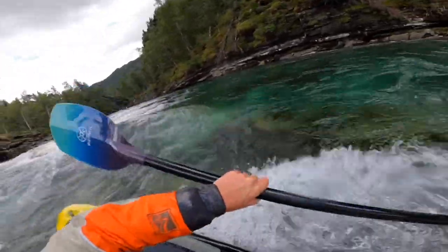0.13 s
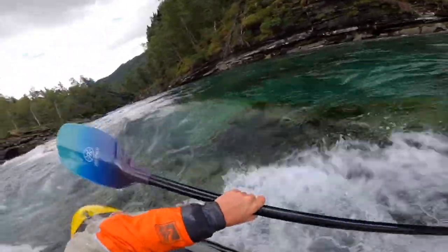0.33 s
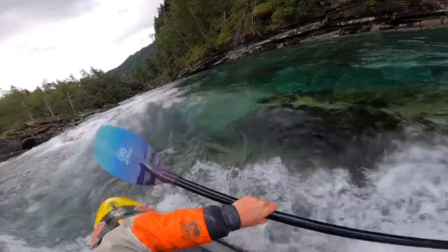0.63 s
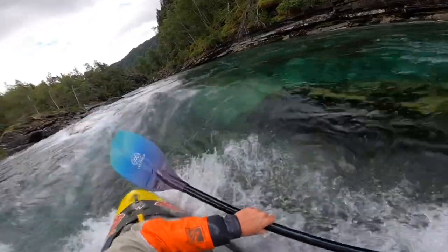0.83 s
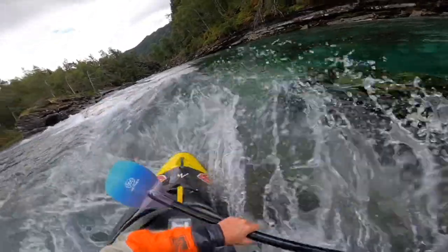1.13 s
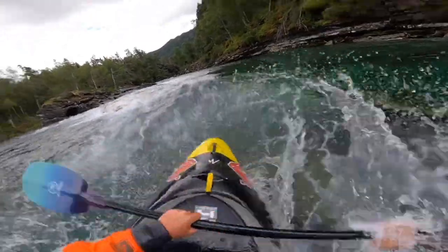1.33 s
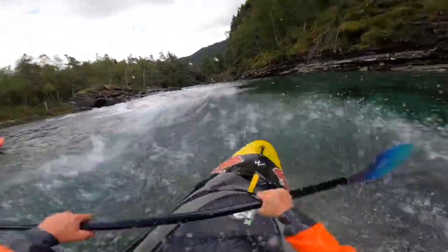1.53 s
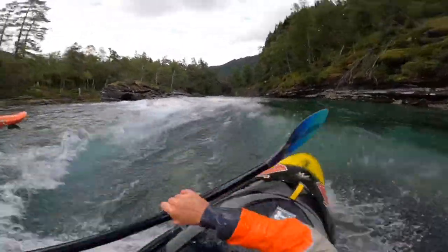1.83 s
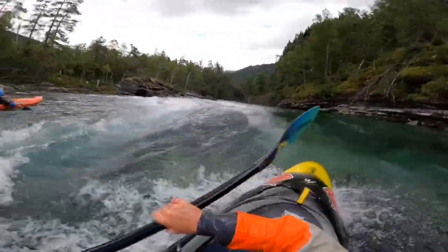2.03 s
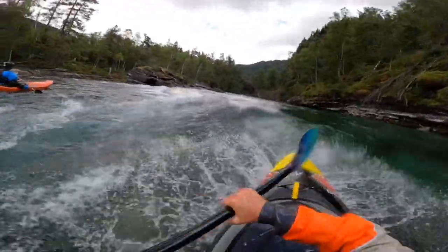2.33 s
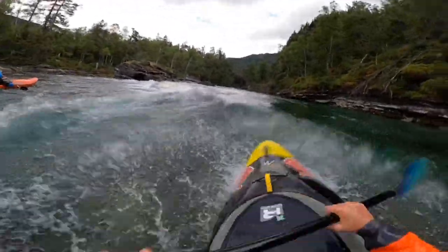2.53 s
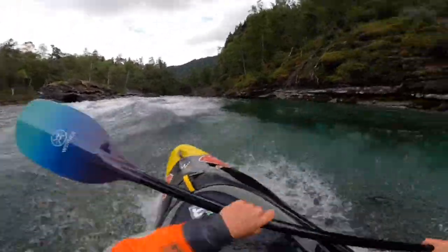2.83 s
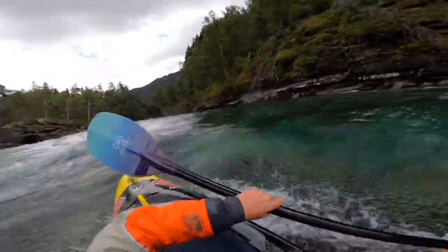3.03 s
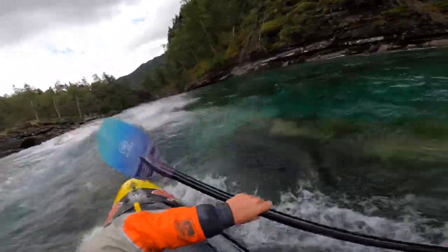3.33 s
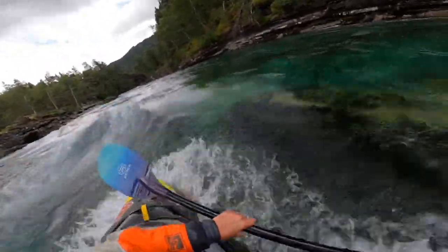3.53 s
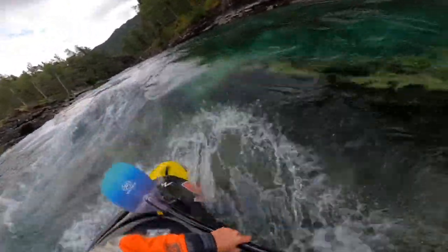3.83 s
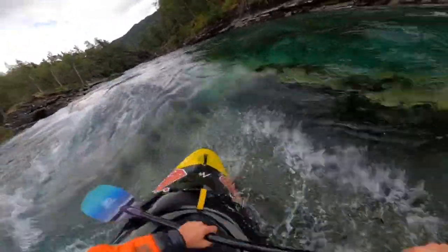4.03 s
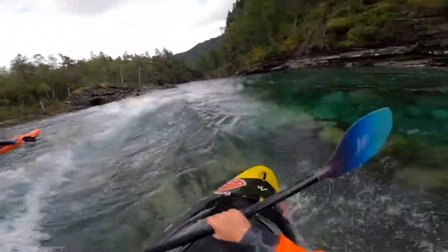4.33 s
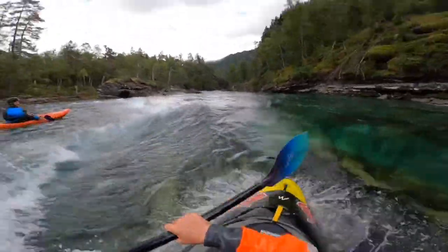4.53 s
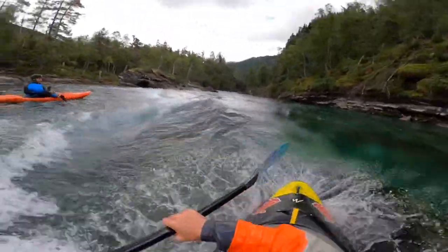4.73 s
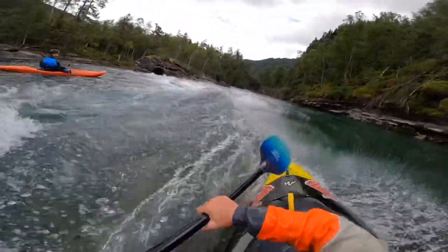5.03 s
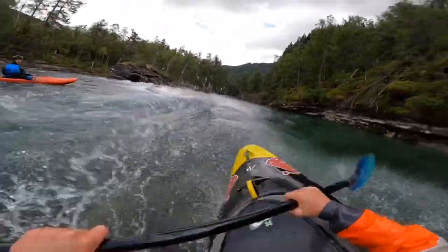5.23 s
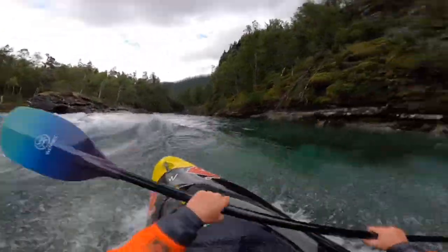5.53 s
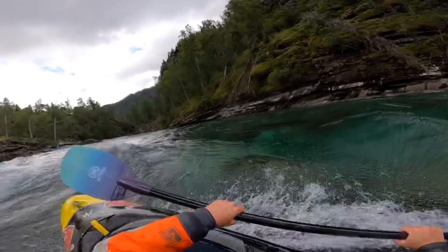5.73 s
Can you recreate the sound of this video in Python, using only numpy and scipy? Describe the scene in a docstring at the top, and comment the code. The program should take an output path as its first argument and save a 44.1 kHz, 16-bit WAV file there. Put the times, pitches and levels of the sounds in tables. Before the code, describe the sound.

Muffled whitewater roars continuously around a surfing kayak, heard from inside a sealed case, with hollow splashes slapping and dull waves booming the hull.

```python
"""White water roars around a kayak surfing a standing wave, heard inside a small sealed case on the paddler's helmet.
Seven bands of bubble bursts, from rumble to fine spray, swell and sink on their own level curves, and gusts buffet the low end.
Splashes slap the case with a knock and a puff of noise, waves boom the hull, and a drop ticks on the case wall.
The case muffles the water above its cavity resonance; a faint smooth hiss lies on top, and a limiter holds the peaks."""
import sys
import numpy as np
from scipy import signal
from scipy.fft import rfft, irfft, next_fast_len
from scipy.io import wavfile
from scipy.ndimage import uniform_filter1d, minimum_filter1d

SR = 44100
rng = np.random.default_rng(int(sys.argv[2]) if len(sys.argv) > 2 else 0)


def to_wav(s):
    """Save 16-bit WAV."""
    ch = np.atleast_2d(s).T  # columns
    pcm = np.round(np.clip(ch, -1, 1) * 32767)  # PCM
    wavfile.write(sys.argv[1], SR, pcm.astype(np.int16))


N = 259737
SPAN = next_fast_len(N)   # working length of the spectra, in samples
HZ = np.fft.rfftfreq(SPAN, 1 / SR) + 1e-3   # kept just off zero for the logarithms
OCTAVES = np.log2(HZ)

# white water swelling as the boat carves into the foam pile:
# [t/s, roar level/dB, upper roar level/dB, spray level/dB, fine spray level/dB]
WHITE_WATER = [(0, -19, -23, -37, -58), (.13, -16, -23, -40, -73), (.25, -18, -23.5, -40.5, -64),
               (.45, -15, -23.5, -38, -70.5), (.7, -14.5, -22.5, -36.5, -68), (.82, -13, -21.5, -38.5, -67),
               (.9, -15.5, -25.5, -40.5, -69), (1, -13.5, -21.5, -38.5, -69), (1.3, -16, -22, -37, -67),
               (1.6, -16, -24, -37, -66.5), (1.8, -16.5, -22, -39, -70), (2, -16.5, -21.5, -36.5, -68),
               (2.15, -13.5, -21.5, -35, -67), (2.35, -17.5, -20, -36.5, -68.5),
               (2.5, -14.5, -23.5, -36.5, -68), (2.62, -18.5, -22, -37, -68), (2.85, -19, -24.5, -37, -71),
               (2.95, -16.5, -22.5, -39, -72), (3.25, -17, -24, -38.5, -70.5),
               (3.5, -18.5, -26, -40.5, -71), (3.85, -19, -25.5, -39, -70.5),
               (3.98, -16.5, -24.5, -40, -71), (4.25, -18.5, -26, -42.5, -73), (4.5, -17, -23, -40, -72),
               (4.7, -17, -23.5, -37, -69.5), (4.87, -13, -20.5, -34.5, -63), (5.05, -16.5, -20, -36, -69),
               (5.25, -17, -21, -34, -68), (5.45, -16.5, -21, -34.5, -65), (5.69, -17.5, -21.5, -37, -70),
               (5.89, -13, -22, -38.5, -67)]
# deep water heaving under the hull: [t/s, rumble level/dB, boom level/dB, churn level/dB]
DEEP_WATER = [(0, -29, -18.5, -18.5), (0.4, -21, -28.5, -17), (0.7, -33, -28, -15),
              (0.9, -29.5, -25, -19.5), (1.15, -33.5, -24, -17), (1.5, -44, -27, -21),
              (1.85, -33, -35.5, -19.5), (2.2, -41, -27.5, -18), (2.4, -46, -25, -21),
              (2.7, -35, -28.5, -20.5), (3.05, -35, -26, -19.5), (3.2, -37, -28, -16),
              (3.42, -29, -23, -17.5), (3.65, -37, -23.5, -19), (3.95, -33, -24.5, -20.5),
              (4.3, -38, -31.5, -20.5), (4.55, -41, -26, -21), (4.8, -38, -26.5, -18.5),
              (5.1, -39.5, -24, -18.5), (5.45, -38.5, -24.5, -20), (5.89, -38, -25, -18.5)]
# seams where one range of the river hands over to the next: [f/Hz]
SEAMS_HZ = [70, 170, 500, 1040, 1750, 5600]
# tone of the water through the case, before each range is levelled: [f/Hz, relative level/dB]
WATER_COLOUR = [(11, -21.5), (25, -13.5), (45, -14), (80, -8), (160, -4), (400, -6), (700, -4), (960, -4),
                (1150, -7), (1500, -17.5), (2100, -23.5), (3600, -35.5), (5000, -52.5), (6100, -68.5),
                (8400, -67.5), (10000, -70), (11400, -88)]
# dips and peaks of the case cavity: [f/Hz, width/Hz, level/dB]
CASE_MODES = [(1072, 75, -10), (1123, 110, 3), (768, 250, 3), (6880, 2100, 9.5)]
# sharpest dip of the cavity: [f/Hz, width/Hz, level/dB]
NARROW_DIP = (986, 22, -5.5)
# gusts buffeting the case, as gain added to the rumble: [t/s, peak level/dB, length/s]
GUSTS = [(0.044, -30, .1), (0.235, -19.5, 0.08), (0.498, -40.5, 0.16), (0.78, -34, .08), (1.03, -36, 0.059),
         (1.194, -34, 0.07), (3.45, -27.5, 0.055), (3.618, -35, 0.063), (3.76, -33, 0.061),
         (5.56, -30, .07), (5.813, -23, 0.092)]
# small splashes, as gain added to the spray: [t/s, peak level/dB]
SPRAY_SPLASHES = [(1.31, -46), (2.29, -50), (4.07, -50), (4.79, -45), (5.03, -45), (5.13, -44), (5.31, -46),
                  (5.41, -45)]
# splashes slapping the case, level before the knock and puff trims: [t/s, level/dB, knock f/Hz]
SLAPS = [(0.688, -4, 517), (1.206, -5, 703), (1.363, -3, 820), (1.798, -5, 926), (1.828, -1, 791),
         (1.853, -3, 800), (1.934, -2, 700), (2.018, -2, 800), (2.04, -3, 740), (2.1, 1, 883),
         (2.18, -2, 845), (2.299, -1, 850), (2.39, -3, 880), (2.435, 0, 760), (4.323, -6, 778),
         (4.852, -2, 789)]
# waves striking the hull, level before the soft-contact filter: [t/s, level/dB, f/Hz]
THUMPS = [(0.244, -5.5, 158), (0.619, -11, 119), (1.099, -6, 173), (2.292, -5.5, 159), (3.406, -11, 178),
          (3.952, -10.5, 156.5), (5.094, -7, 161)]
# drops hitting the case, level before the wall modes: [t/s, level/dB]
DROPS = [(0.3196, -22.5)]
# ringing modes of the case wall: [f/Hz, relative level/dB, T60/s]
WALL_MODES = [(2380, -1, .02), (2620, -3, .016), (3950, -15, .01)]
# swell of the faint hiss: [t/s, level/dB]
HISS_LEVEL = [(0.0, -60), (0.16, -80), (0.21, -104), (1.0, -103), (1.3, -66.5), (1.62, -68), (1.8, -76),
              (2.4, -70), (3.25, -76), (3.95, -68.5), (4.15, -75.5), (4.5, -75), (5.06, -69), (5.89, -74.5)]
# tone of the faint hiss before levelling: [f/Hz, relative level/dB]
HISS_COLOUR = [(11200, -30), (11600, -10), (12200, 0), (14000, -2), (15900, -5)]

GUST_IN_BOOM_DB = -2   # gust gain in the boom, relative to the rumble
SPLASH_S = .025   # bump length of a small splash
LULL_DB, LULL_BEFORE_S, LULL_S = -8, .012, .03   # share taken from the roar, lead before a slap, bump length
PUFF_DB, PUFF_T60_S = -12, .1   # water noise, relative to the slap level
KNOCK_DB, KNOCK_T60_S = -5.5, .09   # cavity ring, relative to the slap level
THUMP_T60_S = 0.11
LIMIT_DB, RELEASE_DB_S, ATTACK_S = -0.7, 130, 0.0026
CUTOFF_HZ = 15700


def river():
    """Seven ranges of moving water swell separately; gusts lift the lowest two and the roar eases around slaps."""
    roar = foam(270, 3000, 15000, 2.2, patchy_db=0.7, rate=14.0)
    spray = foam(950, 14000, 12000, 2.8, patchy_db=0.6, rate=18.0)
    rumble = foam(7.6, 150, 20000, 1.1, patchy_db=2.0, rate=6.7)
    boom = foam(37, 350, 20000, 0.92, patchy_db=-0.5, rate=5.5)
    churn = foam(90, 1000, 20000, 2.0, patchy_db=1.14, rate=16.0)
    spectra = [rumble, boom, churn, roar, roar, spray, spray]

    rumble_level, boom_level, churn_level = amp(in_time(DEEP_WATER))
    roar_level, upper_roar_level, spray_level, fine_spray_level = amp(in_time(WHITE_WATER))
    wind = bumps(GUSTS)
    rumble_level = rumble_level + wind
    boom_level = boom_level + amp(GUST_IN_BOOM_DB) * wind
    lull = bumps([(t - LULL_BEFORE_S, LULL_DB, LULL_S) for t, _, _ in SLAPS])
    roar_level = roar_level * (1 - np.minimum(lull, .5))   # crowded slaps take away half at most
    spray_level = spray_level + bumps([(t, db, SPLASH_S) for t, db in SPRAY_SPLASHES])
    levels = [rumble_level, boom_level, churn_level, roar_level, upper_roar_level, spray_level, fine_spray_level]

    edges = [0] + [below(hz) for hz in SEAMS_HZ] + [1]
    case = through_case()
    out = np.zeros(N)
    for spectrum, level, bottom, top in zip(spectra, levels, edges, edges[1:]):
        crossover = np.sqrt(np.maximum(top - bottom, 0))   # power share to gain
        water = irfft(spectrum * case * crossover, SPAN)[:N]
        out += level * rms_one(water)
    return out


def foam(low, high, per_s, spread_db, patchy_db, rate):
    """Spectrum of dense bubble bursts of uneven size; half-octave bands surge partly alone, partly together."""
    size_db = spread_db * np.minimum(rng.exponential(1, SPAN), 4)
    sizes = amp(size_db) * rng.choice([-1, 1], SPAN)
    happens = rng.random(SPAN) < per_s / SR
    bursts = rfft(rms_one(sizes * happens))
    together = drift(rate)
    out = 0
    for centre in np.arange(np.log2(low), np.log2(high), .5):
        band = np.clip(1 - 2 * np.abs(OCTAVES - centre), 0, 1)   # triangles crossfade between neighbours
        surge_db = patchy_db * (0.63 * together + drift(rate))
        out = out + irfft(bursts * band, SPAN) * amp(surge_db)
    return rfft(out)


def through_case():
    """The case muffles the water while its cavity carves narrow dips and peaks."""
    modes_db = 0
    for hz, width, db in [*CASE_MODES, NARROW_DIP]:
        modes_db = modes_db + db / (1 + (2 * (HZ - hz) / width) ** 2)
    return colour(WATER_COLOUR) * amp(modes_db)


def slaps():
    """Each splash rings the cavity as a knock and throws a puff of water noise that starts at once and dies away."""
    band = below(1500) - below(450)
    noise = rfft(rng.standard_normal(SPAN))
    water = rms_one(irfft(noise * through_case() * band, SPAN)[:N])
    puffs, knocks = np.zeros(N + SR), np.zeros(N + SR)   # spare room for the tails
    age = np.arange(SR // 4) / SR
    rise = np.sin(np.pi / 2 * np.minimum(age / .003, 1)) ** 2   # 3 ms onset
    for t, db, hz in SLAPS:
        start = round(t * SR)
        at = slice(start, start + len(age))
        puffs[at] += amp(db + PUFF_DB - 60 * age / PUFF_T60_S) * rise
        knock = amp(db + KNOCK_DB - 60 * age / KNOCK_T60_S) * rise
        knocks[at] += knock * np.sin(2 * np.pi * hz * age)
    return puffs[:N] * water + knocks[:N]


def thumps():
    """A soft push of water sets the hull booming briefly as a decaying sine."""
    out = np.zeros(N)
    for t, db, hz in THUMPS:
        click = np.zeros(N)
        click[round(t * SR)] = amp(db)
        out += ring(click, hz, THUMP_T60_S)
    # slow contact rounds off the top, the small hull thins the bottom
    soft = signal.butter(3, [95, 320], "band", fs=SR, output="sos")
    return signal.sosfilt(soft, out)


def drops():
    """Each drop is a soft tick that rings the case wall for a moment."""
    clicks = np.zeros(N)
    for t, db in DROPS:
        clicks[round(t * SR)] = amp(db)
    tick = sum(amp(db) * ring(clicks, hz, t60) for hz, db, t60 in WALL_MODES)
    soft = signal.butter(4, 4300, fs=SR, output="sos")
    return signal.sosfilt(soft, tick)


def top_hiss():
    """Smooth noise in the highest band, riding its own level curve."""
    noise = rfft(rng.standard_normal(SPAN))
    hiss = irfft(noise * colour(HISS_COLOUR), SPAN)[:N]
    return amp(in_time(HISS_LEVEL)[0]) * rms_one(hiss)


def amp(db):
    """Decibels to gain."""
    return 10 ** (np.asarray(db) / 20)


def rms_one(x):
    """Scale to an RMS of one."""
    return x / np.sqrt(np.mean(x ** 2) + 1e-20)


def in_time(rows):
    """Columns of a curve table, drawn as straight lines over every sample."""
    t, *columns = np.transpose(rows)
    return [np.interp(np.arange(N) / SR, t, column) for column in columns]


def colour(points):
    """Gain at every frequency, interpolated over log frequency and practically silent outside the points."""
    hz, db = np.transpose(points)
    return amp(np.interp(np.log(HZ), np.log(hz), db, left=-150, right=-150))


def below(hz):
    """Share of power under a soft seam."""
    return 1 / (1 + (HZ / hz) ** 14)


def drift(rate):
    """Slow random motion of spread one: noise at every 40th sample through two one-pole low-passes at rate Hz."""
    r = np.exp(-80 * np.pi * rate / SR)
    noise = rng.standard_normal(SPAN // 40 + 2002)
    slow = signal.lfilter([1], [1, -2 * r, r * r], noise)[2000:]   # skip the filter's settling
    return np.interp(np.arange(SPAN) / 40, np.arange(len(slow)), rms_one(slow))


def ring(clicks, hz, t60):
    """A two-pole resonator: a unit click starts a decaying sine of initial height one."""
    r = amp(-60 / (t60 * SR))
    w = 2 * np.pi * hz / SR
    return signal.lfilter([0, np.sin(w)], [1, -2 * r * np.cos(w), r * r], clicks + 1e-18)


def bumps(rows):
    """Smooth bell-shaped swells of gain, none shorter than 20 ms in length."""
    t = np.arange(N) / SR
    out = np.zeros(N)
    for centre, db, length in rows:
        out += amp(db) * np.exp(-((t - centre) / max(length, .02)) ** 2 * 2)
    return out


def scene():
    """All layers sum at one microphone."""
    return (river() + slaps() + thumps() + drops() + top_hiss())[None]


def record(dry):
    """A look-ahead limiter ducks the whole mix on peaks; the ends fade over 4 ms and the top is cut."""
    over = np.maximum(20 * np.log10(np.abs(dry[0]) + 1e-9) - LIMIT_DB, 0)
    slope = RELEASE_DB_S * np.arange(N) / SR
    held = np.maximum.accumulate(over + slope) - slope   # reduction falls back at the release rate
    size = int(ATTACK_S * SR)
    reduction_db = -minimum_filter1d(-held, 3 * size + 1)   # moving maximum, reaching ahead of each peak
    for _ in range(3):
        reduction_db = uniform_filter1d(reduction_db, size)
    to_end = np.minimum(np.arange(N), np.arange(N)[::-1]) / SR
    fade = np.sin(np.pi / 2 * np.minimum(to_end / .004, 1)) ** 2
    top_cut = signal.ellip(12, .5, 60, CUTOFF_HZ, fs=SR, output="sos")
    return signal.sosfilt(top_cut, dry * amp(-reduction_db) * fade)


dry = scene()
out = record(dry)
to_wav(out)
```